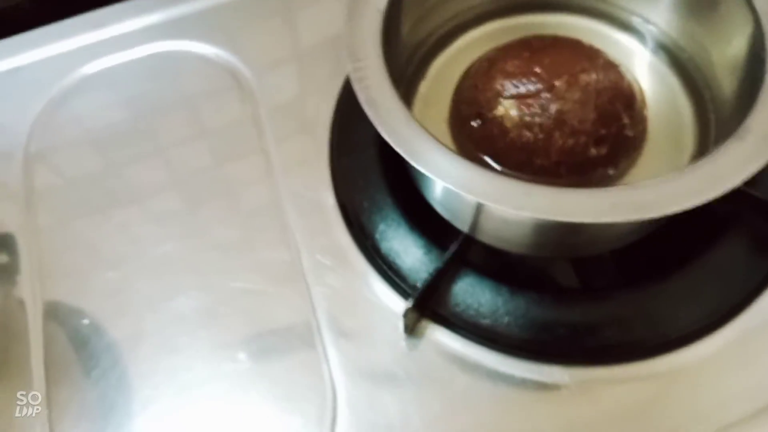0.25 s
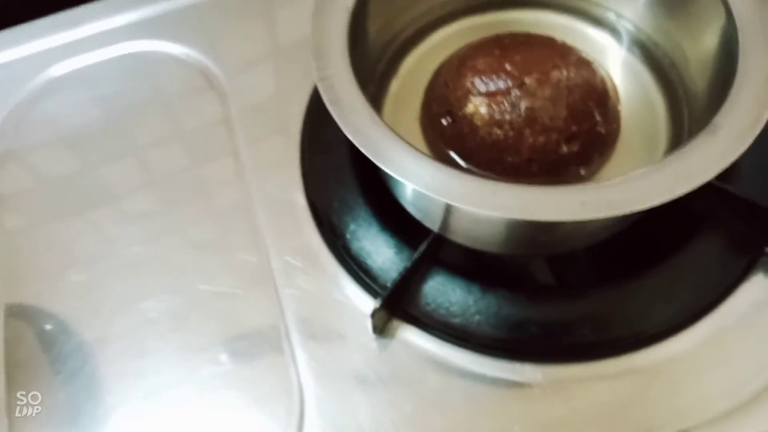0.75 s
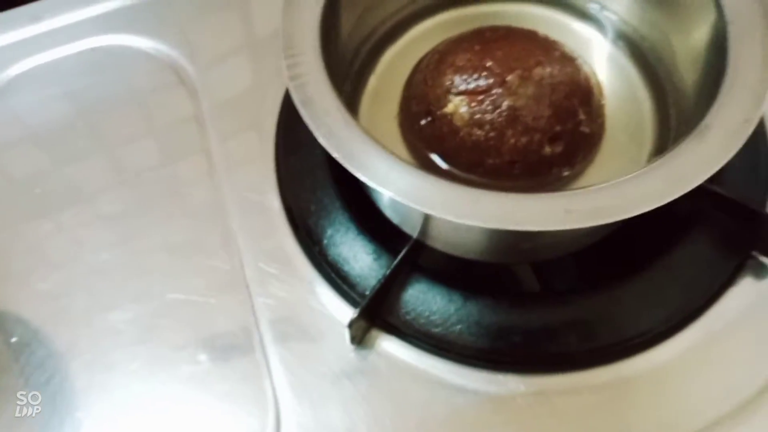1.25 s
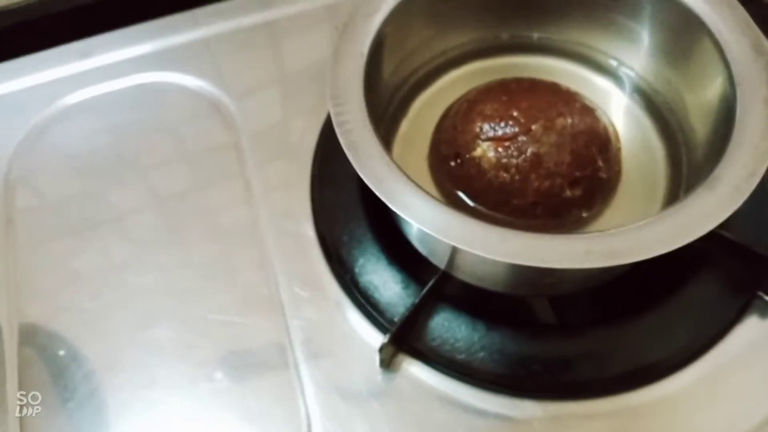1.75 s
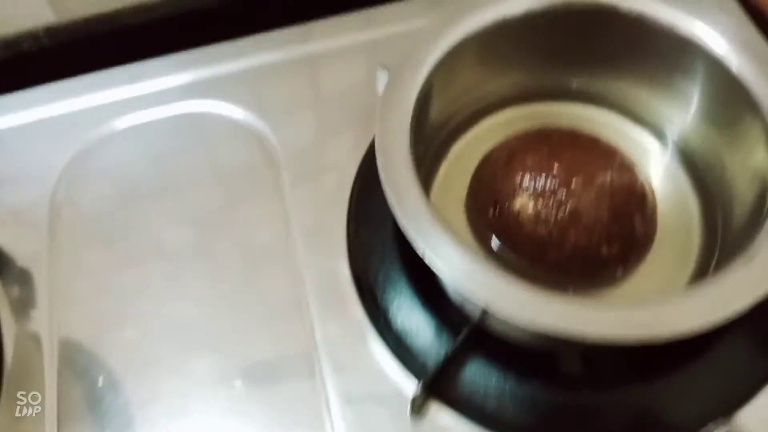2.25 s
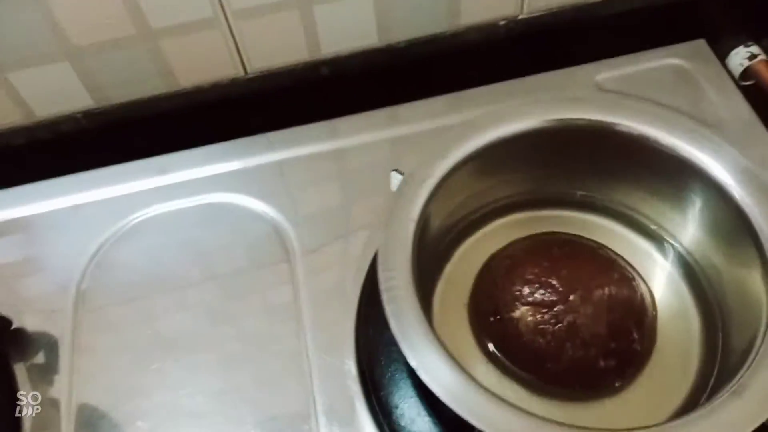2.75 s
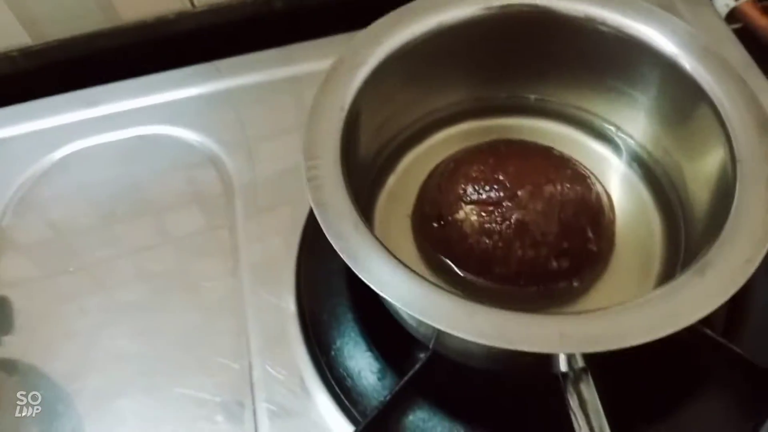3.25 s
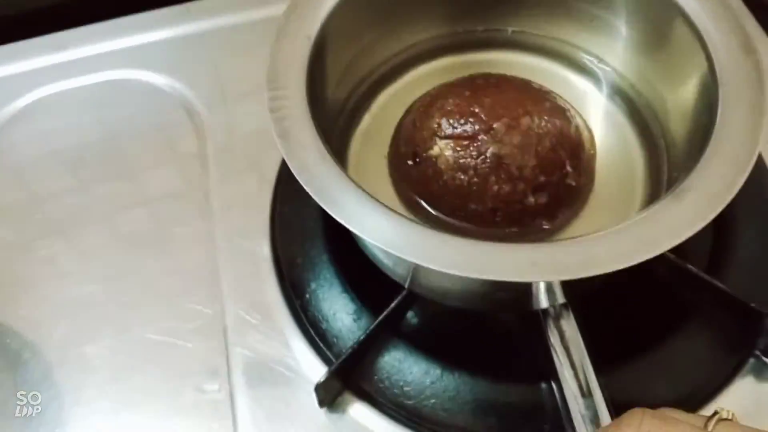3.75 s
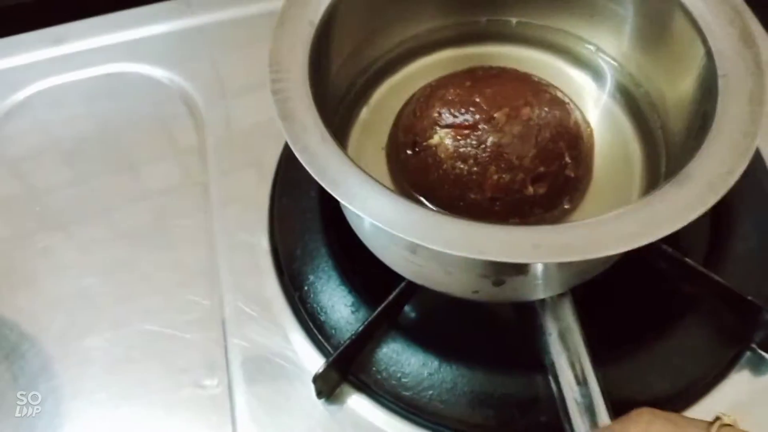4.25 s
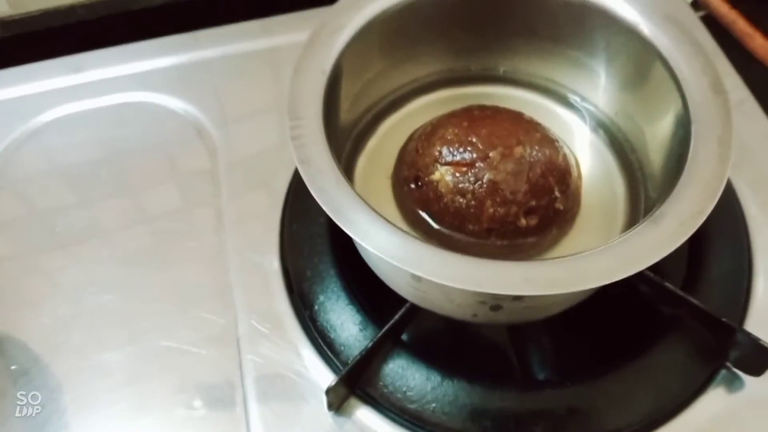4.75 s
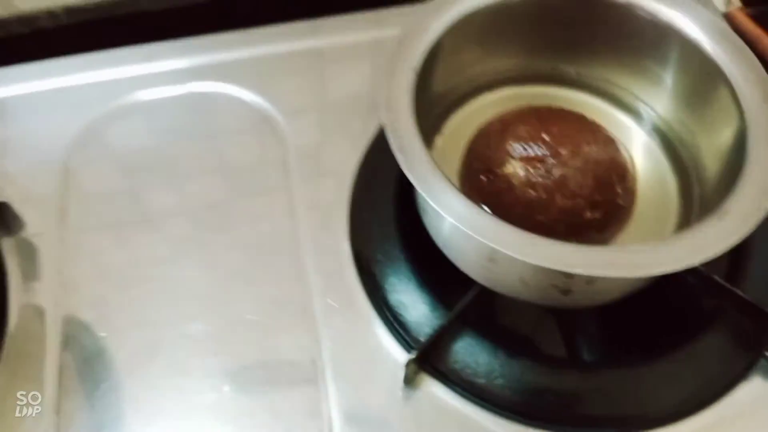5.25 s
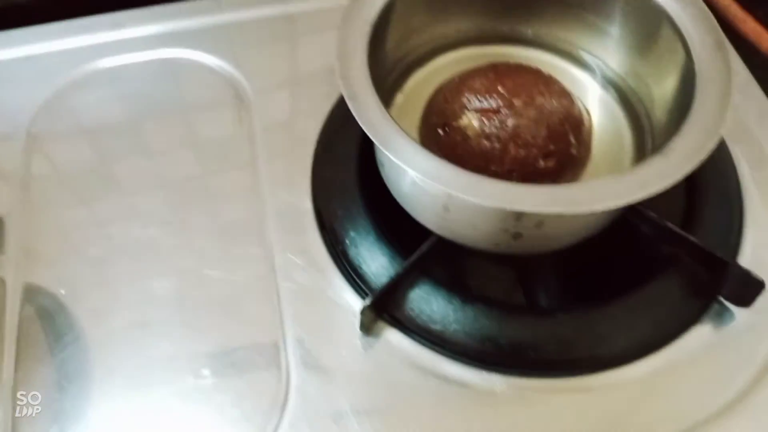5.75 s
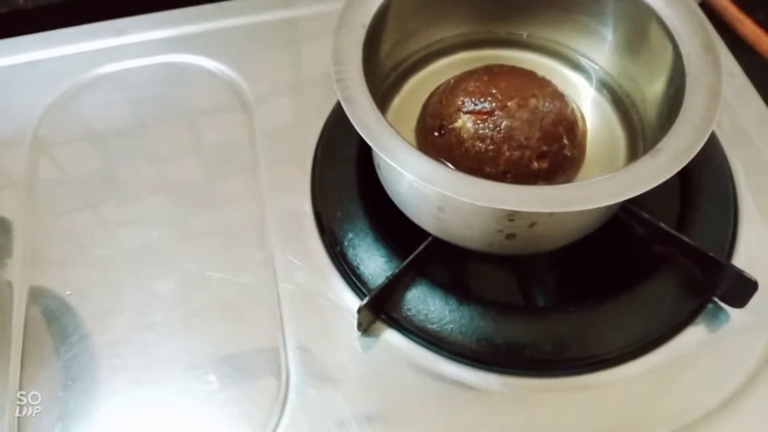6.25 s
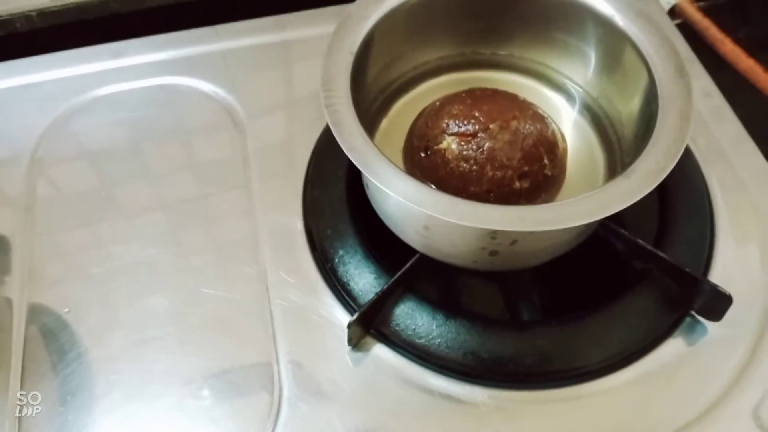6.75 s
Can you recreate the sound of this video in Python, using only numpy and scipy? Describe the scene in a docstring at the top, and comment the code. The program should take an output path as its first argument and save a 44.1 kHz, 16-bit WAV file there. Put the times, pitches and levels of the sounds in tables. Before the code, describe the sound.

Faint, steady, low kitchen noise runs throughout, dipping in quiet stretches. A very weak rattle opens, with dull faint touches at 0.7 and 0.8 seconds, then a clear bright knob clack at 1.0 and a softer knock at 1.2. After near silence, metal knocks begin at 2.4 and crowd together to 3.4, strongest around 2.65 and 3.1, ringing the steel stove top and thin pot. A barely audible thin whistle grows from 3.4. At 3.9 a hard, very short lighter snap is the loudest click; gas catches instantly in a low, fluttering whoomp that fades within half a second, over a hollow low boom lasting longer. Several clunks cluster at 4.2 to 4.4, the main one near 4.29. Crisp knob clicks come at 5.07 and 5.25 to 5.3, echoing briefly in the hard room. Only quiet background remains until 7. The microphone is close.

```python
"""A knob clicks over steady background noise, metal knocks on a gas stove, a lighter snaps and gas catches.
Contacts: banded blows with a short noise rattle, ringing decaying sines of the parts touched, in a hard kitchen.
Before the catch: a faint whistle of resonant noise. The catch: fluttering noise and two low sines, the case's boom.
Then the knob is turned down. A phone microphone is close by; the whole sound sinks in quiet stretches."""
import sys
import numpy as np
from scipy import signal
from scipy.fft import rfft, irfft
from scipy.io import wavfile

SR = 44100
rng = np.random.default_rng(int(sys.argv[2]) if len(sys.argv) > 2 else 0)


def file_out(sig):
    """Save sig as 16-bit WAV at sys.argv[1]."""
    # one column per channel
    cols = np.atleast_2d(sig).T
    # limit, then scale
    lim = np.clip(cols, -1, 1)
    pcm = np.round(lim * 32767).astype(np.int16)
    wavfile.write(sys.argv[1], SR, pcm)


N = 308832
TIME_S = np.arange(N) / SR


def from_db(db):
    """Amplitude gain of a level in dB."""
    return 10 ** (np.asarray(db) / 20)


def level_at_all_times(curve):
    """Level curve interpolated linearly in dB at every sample."""
    times_s, levels_db = np.transpose(curve)
    return np.interp(TIME_S, times_s, levels_db)


def at_hz(points, hz):
    """Spectrum interpolated on a log-frequency axis."""
    points_hz, values = np.transpose(points)
    return np.interp(np.log(np.maximum(hz, 1)), np.log(points_hz), values)


def band(x, low_hz, high_hz):
    """Butterworth band-pass."""
    sos = signal.butter(2, [low_hz, high_hz], "band", fs=SR, output="sos")
    return signal.sosfilt(sos, x)


def coloured(spectrum):
    """Gaussian noise shaped to a spectrum, rms 1."""
    gain = from_db(at_hz(spectrum, np.fft.rfftfreq(N, 1 / SR)))
    noise = irfft(rfft(rng.standard_normal(N)) * gain, N)
    return noise / np.std(noise)


def ring(x, hz, t60_s):
    """Two-pole resonator: a unit click starts a decaying sine of initial height 1."""
    radius = from_db(-60 / (max(t60_s, .002) * SR))
    w = 2 * np.pi * hz / SR
    denominator = [1, -2 * radius * np.cos(w), radius * radius]
    return signal.lfilter([0, np.sin(w)], denominator, x + 1e-18)  # offset avoids denormals


# contact bands, top to bass: (low edge [Hz], high edge [Hz])
CONTACT_BANDS = [(10500, 15500), (6700, 10500), (1600, 4700), (480, 1600), (240, 480)]


def coloured_by(source, levels_db):
    """One source row per contact band, each with the energy of its level held for 10 ms."""
    total = 0
    for row, edges_hz, db in zip(source, CONTACT_BANDS, levels_db):
        part = band(band(row, *edges_hz), *edges_hz)
        total = total + from_db(db) * part / np.sqrt(np.sum(part ** 2) / (SR / 100))
    return total


def struck(events, *parts):
    """A contact's blow rings the parts and fills the room; close by, a rattle stands in for the blow."""
    rattle, blows, drives = np.zeros(N), np.zeros(N), np.zeros((len(parts), N))
    t = np.arange(SR // 5) / SR
    click = np.tile(1. * (t == 0), (len(CONTACT_BANDS), 1))
    for time_s, *row in events:
        levels_db, rattle_s, rings_db = row[:5], max(row[5], .0005), row[6:]
        shape = np.exp(-t / rattle_s) * (1 - np.exp(-t / (0.33 * rattle_s)))  # long contacts set in softly
        blow = coloured_by(click, levels_db)
        start = round(time_s * SR)
        span = slice(start, start + len(t))
        rattle[span] += coloured_by(shape * rng.standard_normal((5, len(t))), levels_db)
        blows[span] += blow
        drives[:, span] += from_db(rings_db)[:, None] * blow
    rings = np.zeros(N)
    for drive, modes in zip(drives, parts):
        for hz, db, t60_s in modes:
            rings += from_db(db) * ring(drive, hz, t60_s)
    return np.array([rattle + rings, blows + rings])  # direct, into the room


# steady background: (frequency [Hz], relative density [dB per Hz])
BACKGROUND = [(15, -36), (25, -28), (80, 3), (200, -12.5), (277, 2.5), (354, -7), (405, -2.5), (503, -12.5),
              (607, -9), (796, -13.5), (3720, -20), (4870, -33), (8830, -20.5), (14800, -30),
              (16000, -26.5)]
BACKGROUND_RMS_DB = -58.5


def background():
    """Steady kitchen background as stationary coloured noise."""
    return from_db(BACKGROUND_RMS_DB) * coloured(BACKGROUND)


# knob contacts, and a faint bright noise just before the last:
# (time [s], level [dB], top over level [dB], clack over level [dB], rattle decay [s],
#  valve ring gain [dB], catch ring gain [dB])
KNOB_SOUNDS = [(0.002, -51.5, -8, -9, 0.038, -11, -34), (1.028, -26, -14.5, -19, 0.017, -0.4, -12.5),
               (5.069, -26, -6.5, -17, 0.0044, -10, 0), (5.077, -44.5, -8, -1, 0.0015, -19, 2),
               (5.25, -27, -12, -15.5, 0.003, -24, -0.8), (5.293, -40, 6.5, -0.5, 0.0029, -15, -17),
               (5.297, -26, -20, -6.5, 0.0045, 2, -28)]
# valve stem modes: (frequency [Hz], gain [dB], t60 [s])
VALVE_MODES = [(129.3, -18.5, 1), (187, -36, 0.47), (649, -27, 0.0078), (3700, -29, 0.004),
               (3988, -14, 0.023), (4600, -17.5, 0.0091), (5830, -9, 0.016), (5500, -18, 0.005),
               (8520, -22.5, 0.0076), (9500, -18, 0.0031)]
# knob's spring catch modes: (frequency [Hz], gain [dB], t60 [s])
CATCH_MODES = [(3500, -24, .006), (7300, -22, .008), (7700, -26, .008), (8050, -26, .015),
               (10950, -26, .01)]
KNOB_MID_OVER_LEVEL_DB, KNOB_BASS_OVER_CLACK_DB = -11.5, -2.5


def knob_sounds():
    """Clicks and clacks ringing valve stem and spring catch; a faint bright noise precedes the last."""
    events = []
    for time_s, db, top_db, clack_db, rattle_s, valve_db, catch_db in KNOB_SOUNDS:
        low_mid_db = db + clack_db
        levels_db = (db + top_db, db, db + KNOB_MID_OVER_LEVEL_DB,
                     low_mid_db, low_mid_db + KNOB_BASS_OVER_CLACK_DB)
        events.append((time_s, *levels_db, rattle_s, valve_db, catch_db))
    return struck(events, VALVE_MODES, CATCH_MODES)


# room decay: (frequency [Hz], t60 [s])
ROOM_DECAY = [(100, 0.97), (400, 0.74), (1500, 0.63), (4000, 0.51), (9000, 0.53), (15000, 0.4)]


def kitchen(x):
    """Dense echoes building up in a few ms, each half octave dying at its own rate; energy 1."""
    t = np.arange(SR) / SR
    edges_hz = 60 * 2 ** np.arange(0, 8.6, .5)
    white = rng.standard_normal((2, SR))
    tail = np.zeros(SR)
    for k, (low_hz, high_hz) in enumerate(zip(edges_hz, edges_hz[1:])):
        t60_s = at_hz(ROOM_DECAY, np.sqrt(low_hz * high_hz))
        tail += band(white[k % 2], low_hz, high_hz) * from_db(-60 * t / t60_s)
    tail *= 1 - np.exp(-t / 0.002)
    return signal.fftconvolve(x, tail / np.sqrt(np.sum(tail ** 2)))[:N]


# microphone port notch and resonance: (frequency [Hz], width [Hz], gain [dB])
PORT = [(5226, 5000, -4), (9240, 830, 2)]
BASS_CUT_HZ = 35


def microphone(x):
    """Bass roll-off, then peaking filters for the port's notch and resonance."""
    x = signal.sosfilt(signal.butter(2, BASS_CUT_HZ, "high", fs=SR, output="sos"), x)
    for hz, width_hz, db in PORT:
        w, gain_root = 2 * np.pi * hz / SR, from_db(db / 2)
        alpha = np.pi * width_hz / SR
        zeros = [1 + alpha * gain_root, -2 * np.cos(w), 1 - alpha * gain_root]
        poles = [1 + alpha / gain_root, -2 * np.cos(w), 1 - alpha / gain_root]
        x = signal.lfilter(zeros, poles, x)
    return x


# quiet stretches: (sinking starts [s], back in full [s], duration of return [s])
QUIET_STRETCHES = [(0.06, 0.704, 0.0026), (0.754, 0.828, 0.0038), (0.911, 1.007, 0.052),
                   (1.418, 2.373, .12), (3.599, 3.721, .01), (3.773, 3.899, 0.0034)]
HUSH_DB, HUSH_SINK_S = -7.5, 0.018


def hush():
    """Gain that sinks quickly in each quiet stretch and is back at its end."""
    depth = np.zeros(N)
    for start_s, end_s, return_s in QUIET_STRETCHES:
        sinking, returning = (TIME_S - start_s) / HUSH_SINK_S, (end_s - TIME_S) / return_s
        depth += np.clip(np.minimum(sinking, returning), 0, 1)
    return from_db(HUSH_DB * depth)


# lighter, hand and pan support knocks: (time [s], level [dB], softness [0-1], thud over level [dB],
#                                        rattle decay [s], pot ring gain [dB])
KNOCK_CONTACTS = [(0.698, -57, 0.9, 3.5, 0.0079, -24.5), (0.835, -56, 0.6, 5, 0.035, -6.5),
                  (1.004, -48, 1, -10, 0.063, -9), (1.215, -35.5, 0.68, -6, 0.02, -37),
                  (1.906, -63, 0.15, -11, .002, -18), (2.374, -31.5, 0.26, -3.5, 0.0089, -25),
                  (2.459, -39.5, 0.02, 1.2, 0.0035, 1), (2.498, -38, 1, -18, 0.056, 21.5),
                  (2.587, -46, 0.28, 4.5, 0.013, -14), (2.604, -34, 0.54, 3, 0.011, -4),
                  (2.651, -26.5, 0.45, 1, 0.021, 6), (2.786, -35, 0.56, -2, 0.0021, 8.5),
                  (2.925, -40, 0.66, -7.5, 0.0044, 10.5), (3.08, -43, 0.6, -18, 0.037, 4.5),
                  (3.112, -28, 0.85, -4, 0.016, -4), (3.203, -46.5, 0.38, -24, 0.003, -16),
                  (3.391, -36.5, 1, -12.5, 0.016, -9), (3.712, -74, 0.7, 11, 0.034, -19),
                  (3.76, -72, .45, -3, 0.021, -32), (4.191, -48, 0.16, -3, 0.0051, -11),
                  (4.266, -41, .95, -17, 0.0032, -22), (4.286, -24, 0.52, -2.4, 0.013, -19),
                  (4.314, -36.5, 0.3, 2, 0.0032, -29), (4.335, -44, 0.24, -27, 0.015, 17),
                  (4.378, -47, 0.09, -30, 0.0068, -20)]
# hard metal knock over its level, top to low-mid: (band level [dB])
HARD_KNOCK = [-2.5, 4.5, 5.5, 0]
# change for a fully soft contact, top to low-mid: (band level [dB])
SOFT_LOSS = [-45.5, -28, -19, -2]
# steel top and pan support modes: (frequency [Hz], gain [dB], t60 [s])
STOVE_MODES = [(97, -35.5, 1), (169.2, -27, 0.46), (280.4, -53, 0.34), (312.4, -41, 0.25), (385, -49, 0.17),
               (484.4, -52, 0.18), (539, -46.5, 0.17), (633, -44.5, 0.12), (702, -44.5, 0.32),
               (775, -42.5, 0.16), (886, -50, 0.32), (1108, -37.5, 0.029), (1500, -59.5, .06),
               (2007, -38.5, 0.046), (4374, -35, 0.016)]
# thin pot wall modes: (frequency [Hz], gain [dB], t60 [s])
POT_MODES = [(2642, -58, .9), (2649, -64, .7), (2859, -58, .25), (3182, -51, .25), (3790, -60, .2)]
STOVE_RING_GAIN_DB = -1.5


def knocks():
    """Softer contacts lose treble; all ring the steel top at the same gain."""
    events = []
    for time_s, db, softness, thud_db, rattle_s, pot_db in KNOCK_CONTACTS:
        upper_db = db + np.add(HARD_KNOCK, softness * np.array(SOFT_LOSS))
        events.append((time_s, *upper_db, db + thud_db, rattle_s, STOVE_RING_GAIN_DB, pot_db))
    return struck(events, STOVE_MODES, POT_MODES)


# faint thin whistle: (time [s], level [dB])
WHISTLE_LEVEL = [(3.3, -100), (3.45, -77), (3.89, -73), (3.9, -100)]
WHISTLE_HZ, WHISTLE_T60_S = 3720, .06


def whistle():
    """Noise through a narrow resonance."""
    tone = ring(rng.standard_normal(N), WHISTLE_HZ, WHISTLE_T60_S)
    return from_db(level_at_all_times(WHISTLE_LEVEL)) * tone / np.std(tone)


# lighter hammer: (time [s], top [dB], treble [dB], upper-mid [dB], low-mid [dB], bass [dB],
#                  rattle decay [s], stove ring gain [dB], pot ring gain [dB])
HAMMER_SNAPS = [(3.897, -28, -17, -19, -24, -37, 0.0009, -0.5, 11)]


def lighter_snap():
    """The hammer's very short bright blow rings stove and pot."""
    return struck(HAMMER_SNAPS, STOVE_MODES, POT_MODES)


# gas cloud burning off: (time [s], level [dB])
PUFF_LEVEL = [(3.899, -91.5), (3.905, -29), (3.93, -23.5), (3.99, -31), (4.06, -36.5), (4.2, -47),
              (4.4, -49), (4.6, -80)]
# puff spectrum: (frequency [Hz], relative density [dB per Hz])
PUFF_SPECTRUM = [(30, -43.5), (60, 1), (110, -2), (170, 2.5), (320, -13.5), (650, -8), (1100, -10),
                 (2400, -24), (3000, -17), (4200, -26.5), (5200, -36), (6900, -23), (9000, -25.5),
                 (15000, -39)]
FLUTTER_RMS_DB = 1.3


def puff():
    """The flame front rushes round the burner: noise whose level flutters at 6.7-130 Hz."""
    flutter = band(rng.standard_normal(N), 6.7, 130)
    flutter_db = FLUTTER_RMS_DB * flutter / np.std(flutter)
    return from_db(level_at_all_times(PUFF_LEVEL) + flutter_db) * coloured(PUFF_SPECTRUM)


# hollow case modes: (frequency [Hz], gain [dB])
CASE_MODES = [(94, 2), (104, -9.5)]
BOOM_START_S, BOOM_RISE_S = 3.9, .004
BOOM_DB = -29.5  # rms of a 0 dB mode before decay
BOOM_FALL_DB_PER_S, BOOM_FALL_DB_PER_S2 = 17, 10.5


def boom():
    """The puff sets the case booming: low sines with an accelerating dB decay."""
    t = np.maximum(TIME_S - BOOM_START_S, 0)
    modes = sum(from_db(db) * np.sin(2 * np.pi * hz * t) for hz, db in CASE_MODES)
    level_db = BOOM_DB - BOOM_FALL_DB_PER_S * t - BOOM_FALL_DB_PER_S2 * t ** 2
    return np.sqrt(2) * from_db(level_db) * (1 - np.exp(-t / BOOM_RISE_S)) * modes


CONTACT_ROOM_DB, PUFF_ROOM_DB = -5, -11


def scene():
    """Mix of all sources, direct and from the room, under the hush gain."""
    direct, into_room = knob_sounds() + knocks() + lighter_snap()
    contacts = microphone(direct + from_db(CONTACT_ROOM_DB) * kitchen(into_room))
    burst = puff()
    ignition = burst + from_db(PUFF_ROOM_DB) * kitchen(burst) + boom()
    mix = background() + contacts + whistle() + ignition
    return (mix * hush())[None]


CUTOFF_HZ = 16300


def record(dry):
    """Tanh rounds the peaks; a steep low-pass cuts the top."""
    rounded = .9 * np.tanh(dry / .9)
    return signal.sosfilt(signal.cheby2(12, 60, CUTOFF_HZ, fs=SR, output="sos"), rounded)


dry = scene()
out = record(dry)
file_out(out)
```